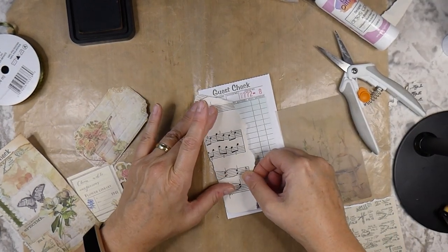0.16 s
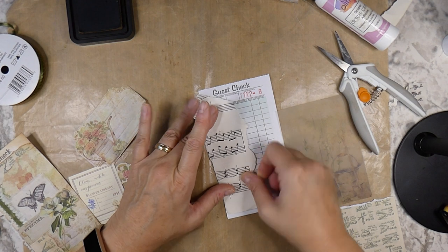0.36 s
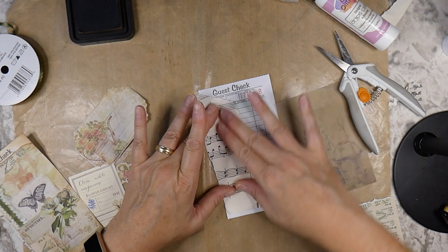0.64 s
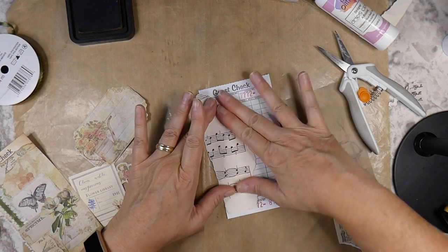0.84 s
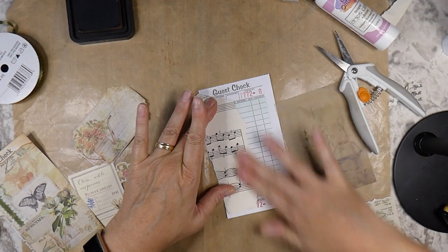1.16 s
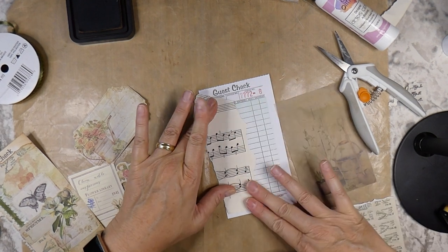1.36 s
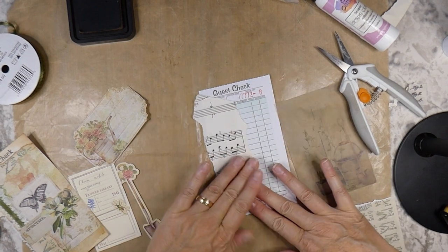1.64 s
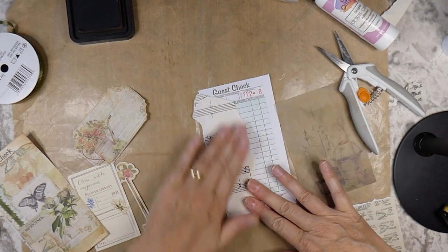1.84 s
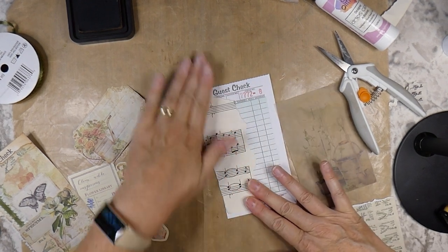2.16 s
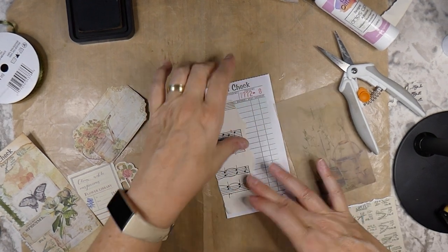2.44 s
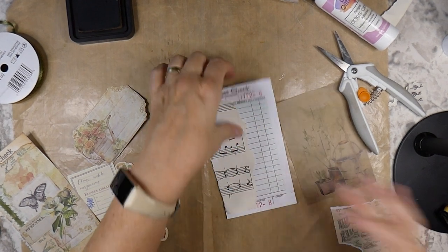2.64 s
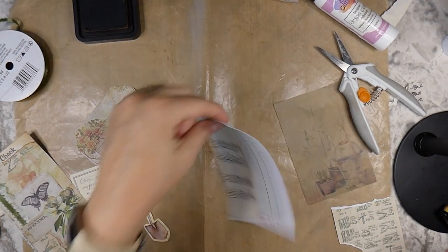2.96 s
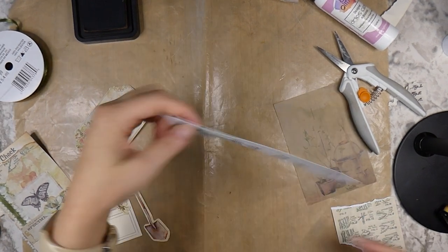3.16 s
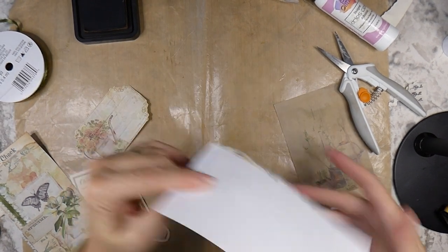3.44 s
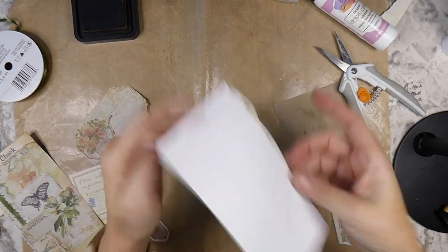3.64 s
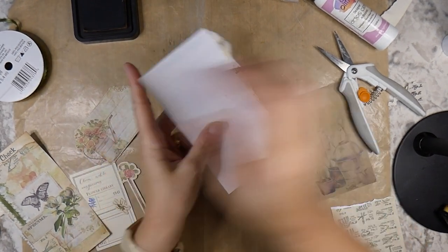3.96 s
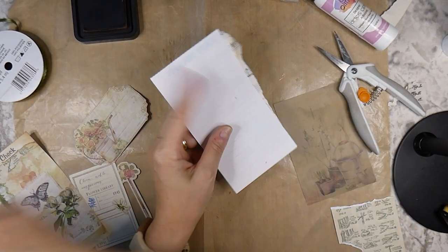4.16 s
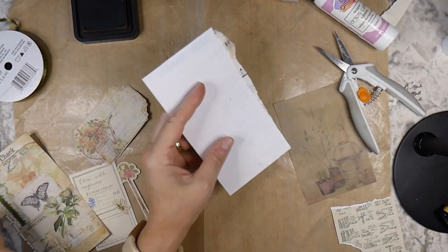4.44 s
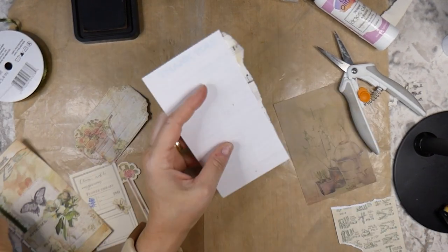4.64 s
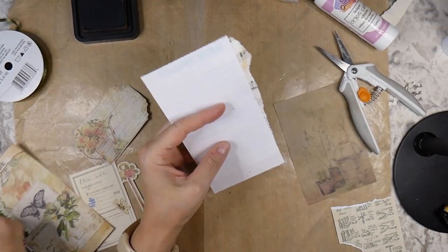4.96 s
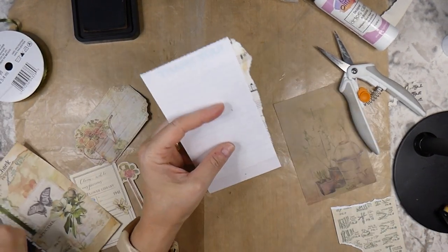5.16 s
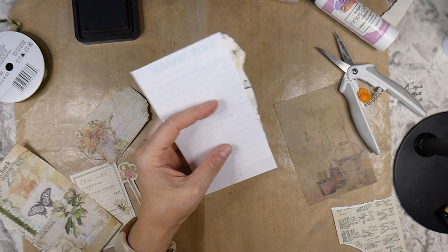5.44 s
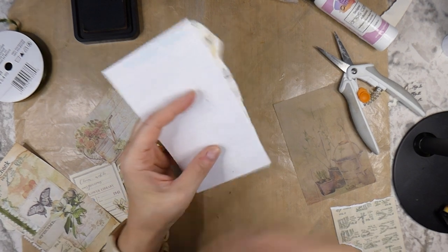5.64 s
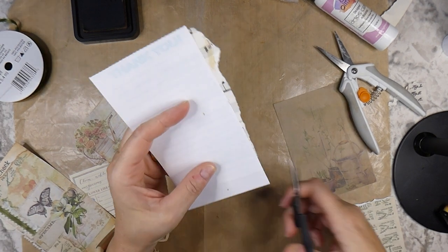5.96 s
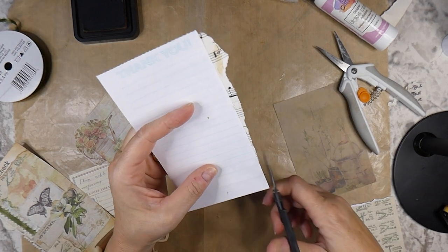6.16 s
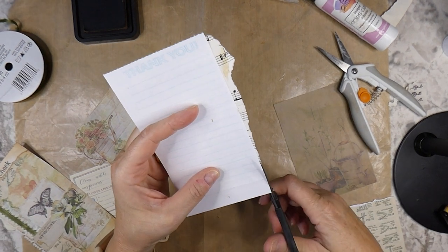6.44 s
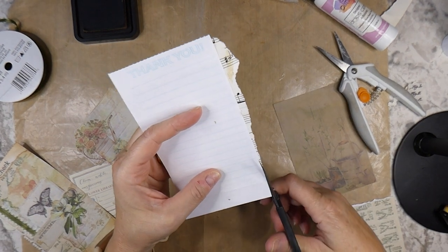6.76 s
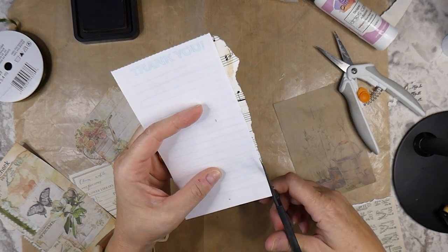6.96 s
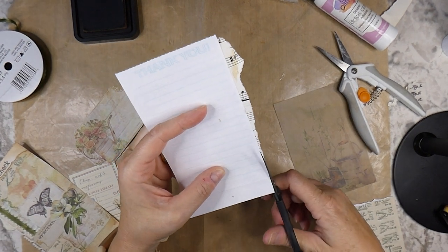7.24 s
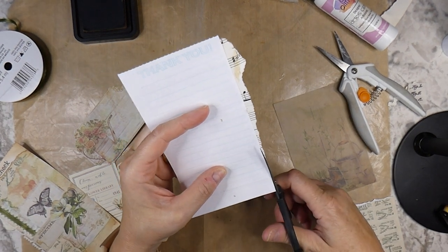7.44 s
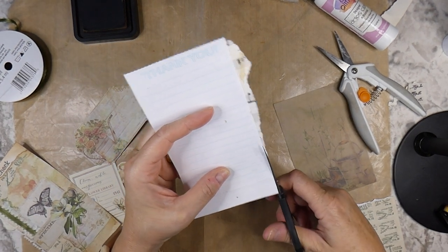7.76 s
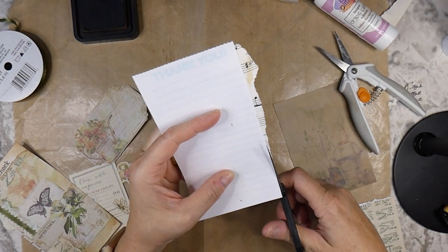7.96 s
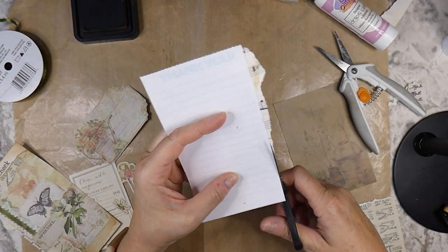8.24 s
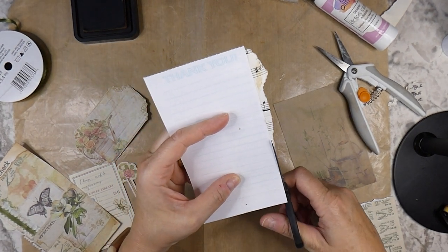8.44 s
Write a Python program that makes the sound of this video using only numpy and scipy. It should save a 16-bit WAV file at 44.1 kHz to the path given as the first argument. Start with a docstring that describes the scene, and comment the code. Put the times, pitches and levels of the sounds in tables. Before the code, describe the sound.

Fingertips smooth paper on a craft table with soft swishes, then it rustles and snaps, scissors clatter, over a low hum.

```python
"""A motor hum and a faint rush of air run throughout a small room, both synthesized as steady beds.
First fingertips smooth a sheet of paper on a craft table: clumped grains, coloured to a hiss.
The sheet is lifted and turned: coarser grains rustle, noise bursts snap.
Scissors are picked up from among other tools: knocks ring steel and board modes, uneven slips scrape.
Last, the blades start to trim: a thin resonant rasp with more rustling."""
import sys
import numpy as np
from scipy import signal
from scipy.fft import rfft, irfft, next_fast_len
from scipy.io import wavfile

SR = 44100
rng = np.random.default_rng(int(sys.argv[2]) if len(sys.argv) > 2 else 0)


def master(y):
    """Save y as 16-bit WAV."""
    cut = np.clip(np.atleast_2d(y).T, -1, 1)
    pcm = np.round(cut * 32767)  # scale
    wavfile.write(sys.argv[1], SR, pcm.astype(np.int16))


N = 379701

# Fingertips wiping the sheet. Each row: start in seconds, length in seconds, hiss level in dB.
SWIPE_STROKES = [(0.556, 0.059, -60), (0.617, 0.16, -62), (0.761, 0.11, -60.5), (0.961, 0.41, -52.5),
                 (1.478, 0.2, -57), (1.712, 0.5, -53), (3.223, 0.088, -61.5), (5.638, 0.082, -61.5),
                 (5.79, 0.19, -69)]
# Sheet lifted, bent or cut. Each row: start in seconds, length in seconds, rustle level in dB.
RUSTLE_STROKES = [(2.625, 0.18, -60), (2.745, 0.14, -56), (2.867, 0.18, -55.5), (3.575, .14, -58.5),
                  (3.954, .12, -60.5), (4.933, .35, -62), (6.437, 0.21, -60), (8.174, 0.2, -66.5),
                  (8.382, .115, -57)]
# Sudden rustles of jolted paper and rough noise of clattering tools.
# Each row: start in seconds, length in seconds, rustle level in dB, hiss level in dB.
SUDDEN_STROKES = [(0.336, 0.21, -63, -54), (3.373, 0.065, -60, -57), (3.884, 0.25, -61, -66),
                  (4.232, 0.052, -59.5, -61.5), (4.422, 0.32, -40.5, -56), (4.731, .14, -54, -55),
                  (4.798, 0.34, -55, -62), (7.62, 0.3, -61.5, -67), (8.009, 0.2, -54.5, -59)]
# Colour of sliding skin. Each row: frequency in Hz, relative level in dB per Hz.
SLIDE_COLOUR = [(1470, -37), (2300, -37), (3300, -12), (5750, -13.5), (6950, -8), (8040, -10.5),
                (10100, -3), (11000, -6), (15500, -31.5)]
# Colour of bending paper. Each row: frequency in Hz, relative level in dB per Hz.
RUSTLE_COLOUR = [(700, -3.5), (1200, -22), (2300, 1), (3200, 3), (4300, 6.5), (5600, 0), (6800, 5),
                 (9600, -23), (13000, -32)]
# Colour of the bright part of a tap. Each row: frequency in Hz, relative level in dB per Hz.
SNAP_COLOUR = [(1500, -75), (3500, -42), (5600, 0), (7500, 16.5), (9700, 29), (12000, 16), (15000, -20)]
# Paper snaps, nail taps, tool clacks. Each row: start in seconds, level in dB, resonance in Hz,
# board thud in dB and treble in dB, both against the level.
TAP_KNOCKS = [(0.2825, -33, 3330, -23, 9), (0.2826, -38, 5600, -35, -30), (0.304, -46, 3620, -30, 10),
              (0.311, -39, 3750, -38, 6), (0.4408, -37, 4520, -22, 1), (2.396, -45.5, 4330, -34, 3.5),
              (2.4798, -41.5, 4030, -27, -6), (2.5057, -43, 3330, -20, -20), (2.5186, -45, 4200, -26, -19),
              (2.757, -19.5, 3140, -23.5, -18), (2.7615, -32.5, 2400, -19, -15),
              (2.98, -28.5, 1900, -37, -11), (3.3831, -38, 4620, -11, -1.5), (3.858, -42, 2200, -25, -9),
              (3.8899, -33.5, 3240, -8, -5), (4.24, -40, 1540, -27, -20), (4.4258, -28.5, 4040, -20, -27),
              (4.433, -25.5, 4800, -34, -3), (4.4369, -17, 5900, -36, -8), (4.4452, -23, 1580, -23, -6),
              (4.4853, -32, 4170, -14, -22), (4.493, -26, 2740, -31, -19), (4.509, -30, 4100, -17, -5.5),
              (4.557, -31.5, 5030, -34, -3), (4.572, -38, 5300, -21, -6), (4.6315, -46.5, 5500, -21, -6),
              (4.8049, -15.5, 6570, -27, -8), (4.8053, -18.5, 2290, -35, -30),
              (4.9727, -37.5, 7000, -14, 2), (4.981, -34, 2200, -18, -16), (5.0942, -41, 5900, -15, -6),
              (5.1442, -36.5, 3300, -26, -14), (5.2365, -32, 2000, -15.5, -29),
              (6.4207, -41, 1640, -14, -7), (6.4547, -34, 2000, -19, -4), (6.4821, -23.5, 2540, -22, -19),
              (6.493, -40, 2770, -25, -2), (6.5108, -39, 2270, -24, -6), (6.533, -35.5, 2520, -31, -4),
              (6.541, -31.5, 2380, -30, -6), (7.173, -42.5, 2450, -30, -13), (7.688, -38, 2450, -29, -2),
              (8.016, -34, 2980, -24, -4), (8.024, -36, 2520, -27, -8), (8.0743, -44.5, 2600, -10, 4)]
# Steel modes of the scissors. Each row: frequency in Hz, level in dB, t60 in seconds.
BLADE_MODES = [(1214, -4.5, .045), (1553, -1.5, 0.025), (2440, -11, 0.055), (2770, -10, 0.015),
               (4190, -8, 0.02), (4980, -7, 0.018), (6530, -7.5, 0.047), (9220, -5, 0.033),
               (9150, -15, .04)]
# Scissors against other tools. Each row: start in seconds, length in seconds, level in dB.
CLATTER_STROKES = [(4.43, 0.34, -42.5), (4.802, 0.13, -45)]
# Blades shearing along the edge. Each row: start in seconds, length in seconds, level in dB.
SHEAR_STROKES = [(7.77, .2, -71), (8.2, .14, -68), (8.38, .11, -65)]
# Table-top modes. Each row: frequency in Hz, level in dB, t60 in seconds.
BOARD_MODES = [(185.5, -4.5, 0.17), (396, -3, 0.049), (576, -9, 0.043), (676, 1.5, 0.054), (918, 2.5, 0.03),
               (1174, -6.5, 0.045), (1520, -7, 0.057)]
# Soft pushes of the palm on the board. Each row: start in seconds, level in dB.
PALM_PUSHES = [(.284, -37.5), (0.601, -46), (2.502, -46), (4.44, -44)]
# Tools dragged or rocking, and low or resonant parts of paper rustles and a faint ringing.
# Each row: start in seconds, length in seconds, level in dB, own resonance in Hz.
SCRAPE_STROKES = [(0.343, 0.024, -57, 2470), (2.682, .035, -62, 3120), (2.935, 0.1, -52.5, 1880),
                  (3.884, 0.047, -52, 750), (4.425, 0.5, -45, 706), (4.79, 0.13, -42.5, 1140),
                  (4.888, 0.026, -50, 650), (4.958, 0.047, -43.5, 570), (5.022, 0.073, -47.5, 640),
                  (5.104, 0.032, -50, 670), (5.151, 0.034, -48, 660), (5.29, 1, -67.5, 3500),
                  (6.47, 0.19, -48, 2290)]
# Colour of the air rush. Each row: frequency in Hz, relative level in dB per Hz.
AIR_COLOUR = [(25, -22), (80, -16), (160, -7), (190, -0.5), (330, 2.5), (400, 3.5), (540, -3.5), (680, 1),
              (780, -4), (1670, -8), (2750, -16), (7870, -25), (9710, -21), (14000, -31.5)]
# Stereo of the air rush. Each row: frequency in Hz, left-right correlation, left minus right in dB.
AIR_WIDTH = [(50, 0.33, 0), (128, 0.7, -0.5), (420, 0.87, 4), (754, 0.13, 3.5), (1310, 0.019, 3.5),
             (2360, 0.074, -0.5), (6800, 0.45, 0), (15000, 0.4, -0.5)]
# Swell of the air around 800 Hz. Each row: time in seconds, gain in dB.
AIR_SWELL_POINTS = [(0, -1), (2.5, -1.5), (4, 1.5), (8.61, 1)]
# Mains buzz. Each entry: multiple of the mains frequency, mean level in dB rms before panning.
MAINS_TONES_DB = {2: -76, 3: -68.5, 4: -65.5, 5: -55.5, 7: -69}
# Motor. Each entry: multiple of the rotor frequency, mean level in dB rms before panning.
ROTOR_TONES_DB = {6: -68, 8: -67}
# Fan. Each entry: multiple of the fan frequency, mean level in dB rms before panning.
FAN_TONES_DB = {1: -81.5, 3: -62.5}

SWIPE_RISE, RUSTLE_RISE, SHEAR_RISE = 0.52, 0.47, 0.42   # shares of the length
SUDDEN_ATTACK_S, SCRAPE_ATTACK_S, CLATTER_ATTACK_S = 0.007, 0.012, 0.006
SWIPE_RUSTLE_DB, RUSTLE_HISS_DB = -15.5, -2   # rustle against a swipe, hiss against a rustle
TICKS_PER_S, TICK_OVER_RUSTLE_DB, TICK_SPREAD_DB = 60, 9, 2
TICK_LOW_HZ, TICK_HIGH_HZ = 1780, 5300
TICK_THUD_DB, TICK_TREBLE_DB, TICK_TOP_DB = -24, -8, -43   # top: before the chance spread
CRACK_T60_S, TAIL_DB, TAIL_T60_S = 0.005, -12, 0.05
TAIL_GROWTH = 0.25   # dB of tail per dB of tap level
TAP_RING_T60_S = 0.0026   # of each of two resonators in series
BROAD_LOW_HZ, BROAD_HIGH_HZ, BROAD_SHARE = 1100, 6000, 0.4
BLADES_START_S, BLADES_END_S = 4.4, 6.62
BLADE_FROM_DB, BLADE_HIT_DB = -22, -17   # lowest ringing tap; steel against the tap
CLATTER_PER_S, SHEAR_HZ, SHEAR_T60_S = 600, 4500, 0.005
ROOM_T60_S, ROOM_DB = 0.12, -7
AIR_DB = -55.5   # rms before drift and swell
MAINS_HZ, ROTOR_HZ, FAN_HZ, HUM_PAN_DB = 59.97, 49.1, 94.2, 1.5
CUTOFF_HZ = 16065   # stopband edge


def hands():
    """Sliding skin gives dense fine grains; bending paper sparser, coarser ones; clatter adds both."""
    slide = np.convolve(grains(15000, spread_db=1.0, clump_db=2.17), causal(SLIDE_COLOUR))[:N]
    slide = rms_one(slide)
    rustle = np.convolve(grains(5000, spread_db=3.0, clump_db=4.0), causal(RUSTLE_COLOUR))[:N]
    rustle = rms_one(crinkle(rms_one(rustle)))
    swipes = [(s, length, db + SWIPE_RUSTLE_DB, db) for s, length, db in SWIPE_STROKES]
    bends = [(s, length, db, db + RUSTLE_HISS_DB) for s, length, db in RUSTLE_STROKES]
    rows = timed(swipes, rise=SWIPE_RISE) + timed(bends, rise=RUSTLE_RISE)
    rows = rows + timed(SUDDEN_STROKES, attack_s=SUDDEN_ATTACK_S)
    out = np.zeros(N)
    for (span, gain), (*times, rustle_db, slide_db) in zip(strokes(rows, fullness=0.76), rows):
        out[span] += gain * (from_db(slide_db) * slide[span] + from_db(rustle_db) * rustle[span])
    return out


def crinkle(x):
    """The bending sheet has many loose resonances that come and go as its shape changes."""
    modes = 0
    for hz in np.geomspace(1700, 5200, 8):
        modes = modes + from_db(3.5 * drift(11.0)) * rms_one(ring(x, hz, 15.0 / hz))
    return x + 0.59 * rms_one(modes)


def ticks():
    """Small snaps fall by chance in rustles and sudden strokes, strongest early; rows like the taps."""
    out = []
    for s, length, db, *rest in RUSTLE_STROKES + SUDDEN_STROKES:
        for when, size, pitch in rng.random((40, 3))[:round(TICKS_PER_S * length)]:
            level_db = min(db + TICK_OVER_RUSTLE_DB, TICK_TOP_DB)
            level_db -= TICK_SPREAD_DB * np.log(size + 1e-3)
            level_db += 20 * np.log10(np.sin(np.pi * when ** 0.37) + 1e-3)
            hz = TICK_LOW_HZ * (TICK_HIGH_HZ / TICK_LOW_HZ) ** pitch
            out.append((s + when * length, level_db, hz, TICK_THUD_DB, TICK_TREBLE_DB))
    return [row for row in out if row[0] < N / SR - 0.01]


def taps(knocks):
    """Each is a noise crack with a dying rattle: bright, resonant and broad parts; tools lie to the right."""
    out, t, snap = np.zeros((2, N + 8000)), np.arange(8000) / SR, causal(SNAP_COLOUR)
    band = signal.butter(2, [BROAD_LOW_HZ, BROAD_HIGH_HZ], "band", fs=SR)
    tail_db = TAIL_DB + TAIL_GROWTH * np.array(knocks)[:, 1:2]
    shape = from_db(-60 * t / CRACK_T60_S) + from_db(tail_db - 60 * t / TAIL_T60_S)
    noise = rng.standard_normal((len(knocks), 8000))
    for (s, db, hz, thud_db, treble_db), burst in zip(knocks, noise * shape):
        bright = signal.fftconvolve(burst, snap)[:8000]
        narrow = ring(ring(burst, hz, TAP_RING_T60_S), hz, TAP_RING_T60_S)
        broad = signal.lfilter(*band, burst)
        crack = from_db(treble_db) * peak_one(bright) + 0.58 * peak_one(narrow)
        crack = crack + BROAD_SHARE * peak_one(broad)
        pan_db = -2.5 if BLADES_START_S < s < BLADES_END_S else 0.8
        out[:, round(s * SR):][:, :8000] += from_db(db) * crack * pan(pan_db)
    return out[:, :N]


def blades():
    """Hard taps ring the steel; clatter catches its modes at random strengths; shearing rasps thinly."""
    hits, loose = np.zeros((2, N))
    for s, db, *rest in TAP_KNOCKS:
        if db > BLADE_FROM_DB and BLADES_START_S < s < BLADES_END_S:
            hits[round(s * SR)] = from_db(db + BLADE_HIT_DB)
    clatter = strokes(timed(CLATTER_STROKES, attack_s=CLATTER_ATTACK_S), fullness=0.58)
    for (span, gain), (*times, db) in zip(clatter, CLATTER_STROKES):
        loose[span] = from_db(db) * gain
    touches = grains(CLATTER_PER_S, spread_db=2.5, clump_db=2.5)
    caught = rng.standard_normal((len(BLADE_MODES), N))

    def struck(clicks):
        """Each click excites every mode by its own chance strength."""
        return sum(from_db(db) * ring(clicks * strength, hz, t60)
                   for (hz, db, t60), strength in zip(BLADE_MODES, caught))

    out = body(hits, BLADE_MODES) + struck(loose * touches) / np.std(struck(touches))
    rasp = rms_one(ring(grains(3000, spread_db=2.5, clump_db=2.5), SHEAR_HZ, SHEAR_T60_S))
    shears = strokes(timed(SHEAR_STROKES, rise=SHEAR_RISE), fullness=1.0)
    for (span, gain), (*times, db) in zip(shears, SHEAR_STROKES):
        out[span] += from_db(db) * gain * rasp[span]
    return out


def board(knocks):
    """The table top's modes answer scrapes, taps and soft pushes."""
    hard, soft = np.zeros((2, N))
    contacts = rng.standard_normal((len(knocks), 200))   # a contact lasts a few ms
    for (s, db, hz, thud_db, treble_db), rattle in zip(knocks, contacts):
        hard[round(s * SR):][:200] += from_db(db + thud_db) * rattle / np.linalg.norm(rattle)
    for s, db in PALM_PUSHES:
        soft[round(s * SR)] = from_db(db)
    palm = signal.butter(2, 480, fs=SR, output="sos")   # a soft contact favours the low modes
    return scrapes() + body(hard, BOARD_MODES[1:]) + signal.sosfilt(palm, body(soft, BOARD_MODES))


def scrapes():
    """Uneven slips ring the board modes and one resonance of each stroke's own."""
    slips = grains(3000, spread_db=1.0, clump_db=2.5)
    board_ring, out = rms_one(body(slips, BOARD_MODES[1:])), np.zeros(N)
    grit = rms_one(signal.lfilter(*signal.butter(2, [1100, 2600], "band", fs=SR), slips))
    rows = timed(SCRAPE_STROKES, attack_s=SCRAPE_ATTACK_S)
    for (span, gain), (*times, db, hz) in zip(strokes(rows, fullness=0.52), rows):
        own = rms_one(ring(slips[span], hz, 14.0 / hz))
        out[span] += from_db(db) * gain * (0.5 * board_ring[span] + 0.46 * grit[span] + 0.7 * own)
    return out


def room(x):
    """A short dull tail of decaying noise, different in each channel."""
    t = np.arange(SR // 2) / SR
    tail = rng.standard_normal((2, len(t))) * from_db(-60 * t / ROOM_T60_S) * (t > 0.003)
    tail = signal.lfilter([1], [1, -0.45], tail)
    return from_db(ROOM_DB) * signal.fftconvolve(x[None], tail / np.linalg.norm(tail[0]))[:, :N]


def hum():
    """Mains buzz, a motor turning under mains speed and a fan: harmonics that each waver in level."""
    t, out = np.arange(N) / SR, 0
    sources = ((MAINS_HZ, MAINS_TONES_DB, 1.8), (ROTOR_HZ, ROTOR_TONES_DB, 2.5),
               (FAN_HZ, FAN_TONES_DB, 1.2))
    for base_hz, levels_db, waver_db in sources:
        for k, db in levels_db.items():
            phase = 2 * np.pi * (k * base_hz * t + rng.random())
            out = out + np.sqrt(2) * from_db(db + waver_db * drift(2.0)) * np.sin(phase)
    return out * pan(HUM_PAN_DB)


def air():
    """Smooth noise rush, most alike in both channels near 420 Hz; its middle swells."""
    mid, side = rng.standard_normal((2, N))

    def channel(sign):
        """Shared noise plus or minus side noise sets the correlation (left +1, right -1)."""
        def gain(hz):
            return from_db(at_hz(AIR_COLOUR, hz) + sign * at_hz(AIR_WIDTH, hz, axis=2) / 2)

        def alike(hz):
            return np.clip(at_hz(AIR_WIDTH, hz), -1, 1)

        shared = coloured(mid, lambda hz: gain(hz) * np.sqrt(1 + alike(hz)))
        return shared + sign * coloured(side, lambda hz: gain(hz) * np.sqrt(1 - alike(hz)))

    both = np.array([channel(1), channel(-1)])
    rush = from_db(AIR_DB + 0.89 * drift(1.2)) * rms_one(both)
    middle = coloured(rush, lambda hz: np.exp(-np.log2((hz + 1) / 800) ** 2 / 2.2))
    swell_db = np.interp(np.arange(N) / SR, *np.transpose(AIR_SWELL_POINTS))
    return rush + (from_db(swell_db) - 1) * middle


def grains(per_s, spread_db, clump_db):
    """Clumped clicks of uneven size: surfaces catching and letting go."""
    sizes_db = spread_db * np.minimum(rng.exponential(1, N), 5) + clump_db * drift(20.0)
    return rms_one(from_db(sizes_db) * rng.choice([-1, 1], N) * (rng.random(N) < per_s / SR))


def timed(rows, rise=0, attack_s=0):
    """(start, length, ..) to (start, fullest, end, ..)."""
    return [(s, s + attack_s + rise * length, s + length, *rest) for s, length, *rest in rows]


def strokes(rows, fullness):
    """Span and gain of each stroke: powered quarter sines; a sudden start dies away faster."""
    t, out = np.arange(N) / SR, []
    for start, full, end, *rest in rows:
        span = slice(round(start * SR), round(end * SR))
        sudden = max((end - full) / max(full - start, 0.005), 1) ** 0.65
        swell = np.sin(np.interp(t[span], [start, full, end], [0, np.pi / 2, np.pi]))
        out.append((span, swell ** np.where(t[span] > full, fullness * sudden, fullness)))
    return out


def body(clicks, modes):
    """Clicks set all modes of one object ringing."""
    return sum(from_db(db) * ring(clicks, hz, t60) for hz, db, t60 in modes)


def ring(clicks, hz, t60_s):
    """Two-pole resonator: a unit click starts a decaying sine of height 1."""
    r, w = from_db(-60 / (t60_s * SR)), 2 * np.pi * hz / SR
    return signal.lfilter([0, np.sin(w)], [1, -2 * r * np.cos(w), r * r], clicks + 1e-18)


def drift(rate_hz):
    """Slow random wander of rms 1: noise through two equal poles, at a 40th of the rate."""
    r = np.exp(-80 * np.pi * rate_hz / SR)
    noise = rng.standard_normal(N // 40 + 2002)
    slow = signal.lfilter([1], [1, -2 * r, r * r], noise)[2000:]   # settled part
    return np.interp(np.arange(N) / 40, np.arange(len(slow)), rms_one(slow))


def causal(spectrum):
    """Minimum-phase impulse response of a spectrum: nothing sounds before a click."""
    cepstrum = irfft(np.log(from_db(at_hz(spectrum, np.arange(513) * SR / 1024))))
    cepstrum[1:512] *= 2   # fold onto positive time
    cepstrum[513:] = 0
    return irfft(np.exp(rfft(cepstrum)))[:512]


def coloured(x, gains):
    """Steady colouring; gains is a function of Hz."""
    size = next_fast_len(N)
    return irfft(rfft(x, size) * gains(np.arange(size // 2 + 1) * SR / size), size)[..., :N]


def at_hz(points, hz, axis=1):
    """One column of a table, interpolated along log frequency."""
    return np.interp(np.log(hz + 1), np.log(np.array(points)[:, 0]), np.array(points)[:, axis])


def pan(db):
    """Left and right gains, db apart."""
    return from_db([[db / 2], [-db / 2]])


def from_db(db):
    """Decibels to gain."""
    return 10 ** (np.asarray(db) / 20)


def rms_one(x):
    """Scale to unit rms."""
    return x / np.sqrt(np.mean(x ** 2) + 1e-20)


def peak_one(x):
    """Scale to unit peak."""
    return x / np.abs(x).max()


def scene():
    """Near sounds with their room, over hum and air; small objects radiate no deep bass."""
    knocks = TAP_KNOCKS + ticks()
    near = hands() * pan(0.48) + board(knocks) * pan(4.4) + taps(knocks) + blades() * pan(-1.0)
    near = signal.sosfilt(signal.butter(4, 165, "high", fs=SR, output="sos"), near)
    return near + room(near.mean(0)) + hum() + air()


def record(dry):
    """A steep low-pass cuts the top."""
    return signal.sosfilt(signal.cheby2(10, 50, CUTOFF_HZ, fs=SR, output="sos"), dry)


dry = scene()
out = record(dry)
master(out)
```